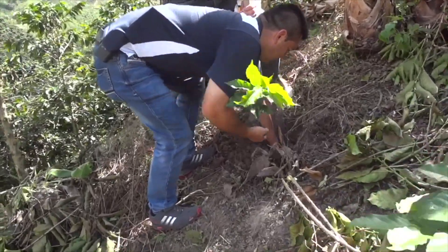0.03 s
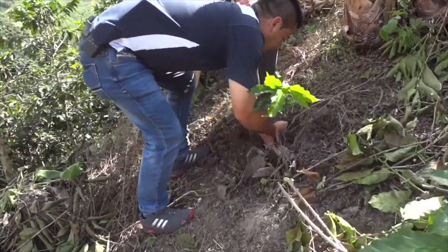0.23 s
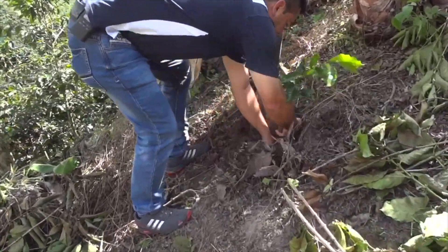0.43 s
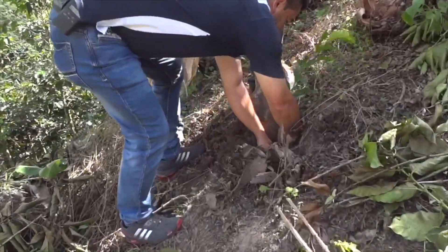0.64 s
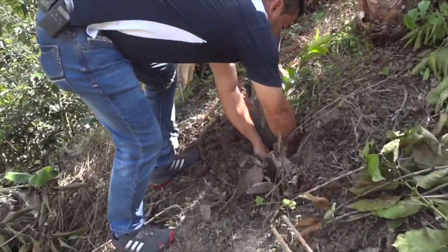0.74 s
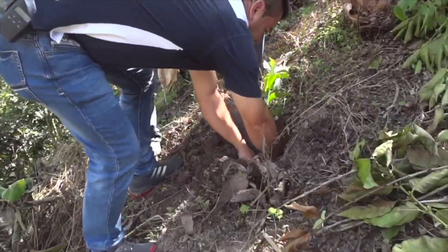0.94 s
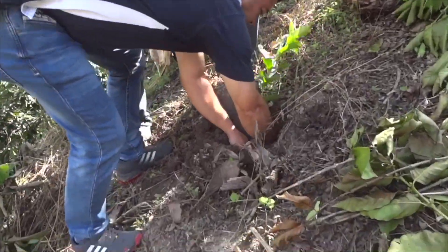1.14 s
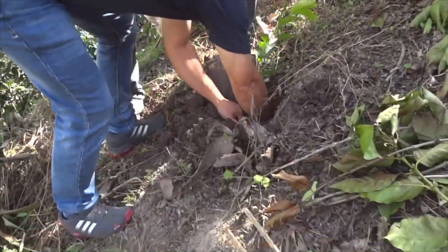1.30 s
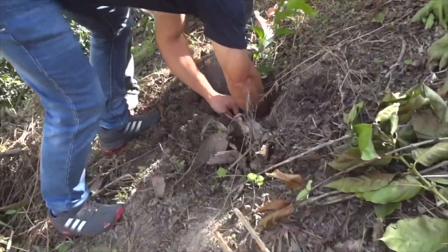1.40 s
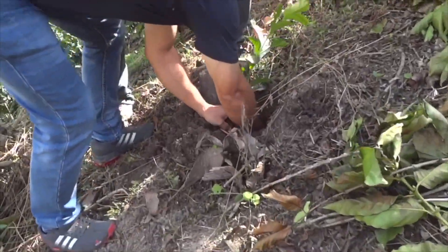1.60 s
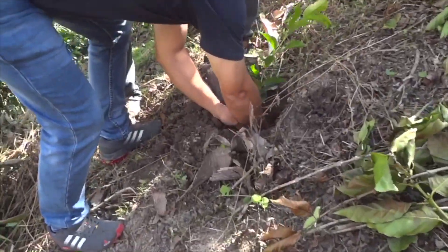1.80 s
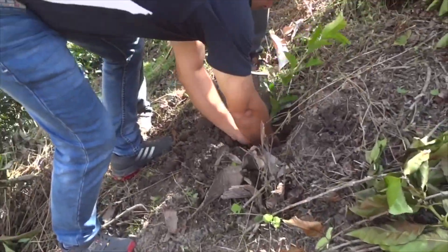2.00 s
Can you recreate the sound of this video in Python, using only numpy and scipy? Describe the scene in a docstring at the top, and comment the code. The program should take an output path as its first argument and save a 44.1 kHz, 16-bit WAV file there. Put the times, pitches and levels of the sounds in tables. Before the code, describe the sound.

Close, dry stereo sound on an open hillside: soil grinding and leaves crunching under hands, busiest at first with sharp stalk cracks, then sparser, ending in a short cluster of dull thumps, over constant faint hiss.

```python
"""An open hillside: hands push loose soil and dry leaves round a seedling, over a steady hiss.
Soil and leaves are clumped clicks ringing many small fragments; scrapes are resonant noise swells.
Stalks and twigs snap one by one, each a crack with splinters through a short resonance.
Soft low bumps and one short stick ring are damped sines with rough bodies; the bumps bunch into
a short, louder rumble near the end, where filtered noise swells beneath them."""
import sys
import numpy as np
from scipy import signal
from scipy.fft import rfft, irfft
from scipy.io import wavfile

SR = 44100
rng = np.random.default_rng(int(sys.argv[2]) if len(sys.argv) > 2 else 0)


def put_to_file(sound):
    """Save the sound as 16-bit audio at rate SR, in the file named by the first command-line argument."""
    columns = np.atleast_2d(sound).T  # one column per channel
    safe = np.clip(columns, -1, 1)
    whole_steps = np.round(safe * 32767)
    wavfile.write(sys.argv[1], SR, whole_steps.astype(np.int16))


N = 90449
T = np.arange(N) / SR
HZ = np.fft.rfftfreq(N, 1 / SR)


def amp(db):
    """Decibels to gain."""
    return 10 ** (np.asarray(db) / 20)


def unit(x):
    """Scales to an rms of one."""
    return x / np.sqrt(np.mean(x ** 2) + 1e-20)


def across(points):
    """Reads a table along log frequency."""
    hz, value = np.transpose(points)
    return np.interp(np.log(HZ + 1), np.log(hz), value)


def level(table, axis=1):
    """Turns one dB column of a table into a gain over time."""
    rows = np.array(table)
    return amp(np.interp(T, rows[:, 0], rows[:, axis]))


def colour(x, points):
    """Filters a sound by a gain table, then sets its rms to one."""
    return unit(irfft(rfft(x) * amp(across(points)), N))


def drift(rate_hz):
    """Smooth random wander with an rms of one."""
    smooth = np.exp(-(HZ / rate_hz) ** 2) * (HZ > 0)
    return unit(irfft(rfft(rng.standard_normal(N)) * smooth, N))


def ring(x, hz, q):
    """A damped resonance; a higher q rings longer."""
    return signal.lfilter(*signal.iirpeak(min(hz, SR * .45), max(q, 1), SR), x)


def pan(pan_db):
    """Left and right gains that differ by pan_db; positive leans left."""
    return amp([[pan_db / 2], [-pan_db / 2]])


def add(mix, s, sound):
    """Lays a stereo sound into the mix at s seconds."""
    part = mix[:, max(round(s * SR), 0):][:, :sound.shape[1]]
    part += sound[:, :part.shape[1]]


def grains(per_s, spread_db, clump_db, clump_hz, q, count=24):
    """Tiny fractures come in clumps; each rings one of many fragments for a few cycles."""
    out = np.zeros(N)
    for hz in np.geomspace(700, 11000, count):
        chance = rng.random(N)
        size = np.minimum(rng.exponential(1, N), np.pi)
        sign = rng.choice([-1, 1], N)
        clicks = (chance < per_s / count / SR) * amp(spread_db * size) * sign
        out += unit(ring(clicks, hz, q)) * np.sqrt(hz)  # wider bands carry more power
    return out * amp(clump_db * drift(clump_hz))


# how hard each material is worked: start_s [s], soil_level_db [dB], leaf_level_db [dB]
WORK_LEVELS = [(0, -39.5, -40.5), (.03, -40.5, -40), (.055, -34, -35.5), (.1, -33.5, -34),
               (.135, -30, -35.5), (.175, -35, -36.5), (.252, -33.5, -35), (.277, -28.5, -32),
               (.3, -35.5, -30.5), (.325, -34.5, -31), (.35, -39.5, -39), (.39, -42, -39.5),
               (.47, -42.5, -36), (.5, -45, -36), (.535, -51, -36), (.565, -33, -36.5), (.61, -44.5, -34),
               (.655, -39, -32.5), (.7, -40.5, -38.5), (.75, -44.5, -39), (.772, -38, -35.5),
               (.815, -39, -33.5), (.85, -33.5, -38), (.91, -41.5, -39.5), (.95, -37.5, -40.5),
               (1., -59, -42.5), (1.025, -37, -42), (1.06, -43.5, -40), (1.12, -36, -47), (1.155, -43, -48),
               (1.2, -41.5, -43), (1.275, -37.5, -45), (1.31, -40.5, -50), (1.42, -43, -42.5),
               (1.52, -40.5, -44.5), (1.58, -34.5, -45.5), (1.62, -40, -40), (1.655, -35.5, -40),
               (1.71, -39, -42.5), (1.74, -35, -49), (1.77, -47.5, -42), (1.835, -35.5, -46),
               (1.885, -39.5, -64), (1.93, -34.5, -41.5), (1.99, -37.5, -36), (2.05, -34, -40.5)]
# tone of the grinding crumbs: frequency_hz [Hz], relative_gain_db [dB]
SOIL_COLOUR = [(60, -40), (180, -12), (300, -3), (500, -8.5), (1000, -3), (1600, -2), (2200, -3.5),
               (3100, -0.5), (4500, -4.5), (7000, -8.5), (11000, -17.5)]


def soil():
    """Crumbs grind against each other under the palms, each fracture ringing a fragment."""
    crumbs = grains(per_s=7000, spread_db=0.0, clump_db=2.5, clump_hz=110, q=4.8)
    return level(WORK_LEVELS, axis=1) * colour(crumbs, SOIL_COLOUR)


# tone of the crackling leaves: frequency_hz [Hz], relative_gain_db [dB]
LEAF_COLOUR = [(100, -27), (500, -17), (1000, -23.5), (2000, -8.5), (3800, 3), (5500, -2), (7800, 1.5),
               (9500, -0.5), (11000, -5.5)]


def leaves():
    """Dry leaves crackle as they are pushed into the hole, in shorter rings than the soil."""
    crackle = grains(per_s=5000, spread_db=0.5, clump_db=0.5, clump_hz=228, q=2.4)
    return level(WORK_LEVELS, axis=2) * colour(crackle, LEAF_COLOUR)


# snapping stalks and twigs: start_s [s], level_db [dB], ring_hz [Hz],
# crack_db [dB, sharp crack against the ring], length_s [s], pan_db [dB, left over right]
STALK_SNAPS = [(0.0533, -30, 4640, -14, 0.0045, 2), (0.1195, -21.5, 2430, -11, 0.0022, -3),
               (0.237, -37, 2900, -2, 0.0013, 5), (.2682, -14.5, 2700, 8, 0.00066, 1),
               (0.2734, -29.5, 7300, -15, .006, -3), (0.295, -32, 4300, 5, 0.0009, 1),
               (0.307, -33, 7460, 3, .0012, -2), (0.32, -23, 7000, -5, 0.001, 1),
               (0.324, -31, 3350, -13, 0.0042, 1), (0.333, -28, 8460, 4, 0.00091, -1),
               (.3388, -24.5, 4000, 22, 0.00091, 0), (0.4895, -25.5, 6000, 17, 0.0015, 1),
               (0.5127, -24, 3320, -2, .0012, 2), (.5542, -28.5, 8200, 0, 0.0012, 1),
               (0.6445, -24.5, 5450, -4, 0.00074, 4), (0.6586, -20.5, 2400, -2, 0.0011, 1),
               (0.723, -29, 3500, -20, 0.0018, 0), (0.7671, -24.5, 3500, 21, .0012, -1),
               (0.7706, -24, 3600, 12, 0.0032, 0), (0.7845, -20.5, 4370, 0, 0.00069, 1),
               (.7925, -26, 7300, 4, 0.0013, -6), (.7962, -22.5, 10300, 0, .0012, 1),
               (.8135, -32, 10300, 1, 0.0054, 0), (0.8436, -23, 4180, 10, 0.0029, 0.5),
               (0.891, -26, 4300, -20, 0.00093, 0), (.9401, -27.5, 3900, -5, .001, -4),
               (0.948, -26, 3600, 3, 0.0016, 5.5), (0.975, -26, 4460, -19, 0.0021, 0),
               (0.9843, -28, 7600, 10, 0.0013, -12), (1.0341, -18.5, 2800, 8.5, 0.00057, -6),
               (1.038, -29, 4340, -19, 0.00074, -15), (1.1184, -31, 2250, -7, 0.0022, -9),
               (1.1657, -22.5, 4500, -2, 0.00072, 2.5), (1.241, -30, 2250, -1, 0.0012, -7),
               (1.25, -30.5, 8100, -5, .001, -1), (1.2718, -29, 2440, -6, 0.002, -5),
               (1.483, -26, 3630, -9, 0.00058, 0), (1.5437, -27.5, 3200, -7, .0028, 0),
               (1.666, -37, 3030, 11, 0.00085, -2), (1.743, -31, 3530, -1, .001, 0),
               (1.7886, -31, 3860, -21, 0.0016, 3), (1.835, -32.5, 2260, -14, 0.0015, 1)]
SNAP_RISE_S, SNAP_Q, SPLINTERS_PER_S = 0.00017, 1.9, 9000
CLEAN_BREAK_S = 0.0003  # a break this long has as much energy in its splinters as in its first crack


def snaps():
    """A stalk breaks with one crack and rings briefly; longer breaks put more energy into splinters."""
    out = np.zeros((2, N))
    t = T[:2048] - T[128]  # the first crack falls at zero
    for s, db, hz, crack_db, length, pan_db in STALK_SNAPS:
        run = np.exp(-np.maximum(t, 0) / length + np.minimum(t, 0) / SNAP_RISE_S)
        hits = rng.random(len(t)) < SPLINTERS_PER_S / SR
        splinters = unit(hits * rng.choice([-1, 1], len(t)) * run)
        splinters = splinters * np.sqrt(length / CLEAN_BREAK_S / len(t))
        force = np.where(t == 0, 1, splinters)
        crack = signal.lfilter(*signal.butter(2, [1300, 12000], "band", fs=SR), force)
        stalk = ring(ring(crack, hz, SNAP_Q), hz, SNAP_Q)
        sound = unit(stalk) + amp(crack_db) * unit(crack)
        sound = amp(db) * unit(sound) * np.sqrt(length / t[-1])  # level_db is spread over length_s
        add(out, s + t[0], sound * pan(pan_db))
    return out


# hands and sleeves rubbing along the ground and the wall of the hole:
# start_s [s], length_s [s], level_db [dB], resonance_hz [Hz], pan_db [dB, left over right]
RUBS = [(0.017, 0.12, -57, 332, 0), (0.106, 0.052, -36.5, 2650, -3), (0.243, 0.052, -40, 1290, 5),
        (0.651, 0.012, -32.5, 2020, -4), (1.007, 0.044, -37.5, 2140, -3), (1.088, 0.057, -43, 2270, -1),
        (1.147, 0.071, -38, 2310, -4), (1.228, 0.064, -39.5, 2500, -1), (1.32, 0.056, -48, 2500, -10),
        (1.642, .03, -37.5, 2460, -1)]
SCRAPE_Q = 3.7


def scrapes():
    """An uneven rub swells and fades through one broad resonance."""
    out = np.zeros((2, N))
    for s, length, db, hz, pan_db in RUBS:
        rub = rng.standard_normal(N) * amp(1.8 * drift(rate_hz=100))
        rub = unit(ring(ring(rub, hz, SCRAPE_Q), hz, SCRAPE_Q))
        arch = np.sin(np.pi * np.clip((T - s) / length, 0, 1)).clip(0) ** 0.44
        out += amp(db) * arch * rub * pan(pan_db)
    return out


# dull low bumps, and at 1.546 s the short ring of a stick: start_s [s],
# tone_peak_db [dB, before the low cut], pitch_hz [Hz], decay_s [s],
# left_lead_rad [radians by which the left side leads]
BUMPS_AND_STICK = [(0.2894, -38.5, 124, 0.014, 1.4), (0.4497, -29.5, 250, 0.0022, -1.8),
                   (.459, -37, 110, 0.0032, .2), (1.02, -30, 253, 0.0029, 1.95),
                   (1.028, -39, 110, 0.0041, .8), (1.073, -40.5, 180, .005, 1.7),
                   (1.195, -30, 232, 0.0011, -2.6), (1.245, -39.5, 149, 0.0028, 1),
                   (1.322, -41, 130, .005, 1.6), (1.34, -35, 170, 0.003, 1.6),
                   (1.352, -39, 130, 0.0077, 0.85), (1.396, -39.5, 180, .003, 1.3),
                   (1.45, -39.5, 128, 0.0049, 1.3), (1.546, -38, 675, 0.009, 0.9),
                   (1.5642, -35, 169, 0.0064, 1.5), (1.761, -33, 150, 0.0062, 1.4),
                   (1.773, -29, 167, 0.025, 1.3), (1.796, -27, 248, 0.015, 2),
                   (1.8205, -25, 190, 0.0099, 1.2), (1.831, -17, 347, 0.002, 2.2),
                   (1.837, -22, 181, 0.013, 2), (1.854, -19, 184, 0.011, 0.49),
                   (1.8622, -21.5, 312, 0.011, 2.33), (1.8841, -20, 440, 0.0042, 1.93),
                   (1.889, -22.5, 246, 0.0032, 1.4), (1.907, -37, 152, 0.0051, 0.82),
                   (1.927, -32, 170, .005, 2.4), (1.939, -38, 131, .005, 1.4),
                   (1.961, -25.5, 192, 0.003, 2.1), (2.028, -32, 205, 0.0092, 3.7),
                   (2.036, -47, 234, 0.0041, 1.5)]
BUMP_RISE_S, BUMP_DIRT_DB = 0.00085, -12.5  # onset; rough body against the tone


def bumps_and_stick():
    """Low bumps and one stick ring, each a quickly decaying sine with a little rough body."""
    out = np.zeros((2, N))
    t = T[:4096]
    for s, db, hz, decay, lead in BUMPS_AND_STICK:
        shape = (1 - np.exp(-(t / BUMP_RISE_S) ** 2)) * np.exp(-t / decay)
        phase = 2 * np.pi * hz * t + np.array([[lead / 2], [-lead / 2]])
        dull = signal.butter(4, 1.79 * hz, fs=SR, output="sos")
        body = unit(signal.sosfilt(dull, rng.standard_normal(len(t))))
        knock = np.sin(phase) + amp(BUMP_DIRT_DB) * body
        add(out, s, amp(db) * shape / shape.max() * knock)
    low_cut = signal.butter(3, 70, "high", fs=SR, output="sos")
    return signal.sosfilt(low_cut, out)


# swell of the rumble under the bumps, before its lumps: start_s [s], level_db [dB]
RUMBLE_LEVELS = [(0, -72), (.17, -75), (.225, -60), (.25, -63), (.3, -52), (.34, -67), (.43, -63),
                 (.465, -49), (.52, -61.5), (.65, -67.5), (.74, -65), (.785, -52.5), (.85, -65.5),
                 (.98, -66.5), (1.03, -55), (1.1, -61), (1.35, -52.5), (1.51, -59), (1.57, -48.5),
                 (1.62, -62), (1.72, -62), (1.79, -40), (1.86, -35), (1.91, -38), (2., -46.5), (2.05, -34)]
# tone of the rumble: frequency_hz [Hz], relative_gain_db [dB]
RUMBLE_TONE = [(20, -46), (50, -17), (85, -5.5), (170, -2.5), (300, -8.5), (480, -11.5), (800, -22),
               (2000, -42)]
RUMBLE_LEAD_S, RUMBLE_SPREAD_DB = 0.00067, -3  # left lead; separate noise against the shared noise


def rumble():
    """Low noise swells in uneven lumps; its shared part reaches the left side first."""
    noise = rng.standard_normal((3, N))
    lead = np.exp(1j * np.pi * HZ * RUMBLE_LEAD_S * np.array([[1], [-1]]))
    shared = irfft(rfft(noise[2]) * lead, N)
    pair = shared + amp(RUMBLE_SPREAD_DB) * noise[:2]
    lumps = amp(2.1 * drift(rate_hz=66))
    return level(RUMBLE_LEVELS) * colour(pair, RUMBLE_TONE) * lumps


# likeness of diffuse sound at the two microphones:
# frequency_hz [Hz], correlation [no unit, clipped to -1..1 in use]
DIFFUSE_LIKENESS = [(60, -0.47), (270, -0.04), (570, 2.54), (1200, 0.85), (2600, 2.8), (5500, 3.4),
                    (11000, 3.44)]


def diffuse(pair):
    """Two unrelated signals become sound that reaches both microphones from all round."""
    a, b = rfft(pair, N)
    likeness = np.clip(across(DIFFUSE_LIKENESS), -1, 1)
    mid = a * np.sqrt((1 + likeness) / 2)
    side = b * np.sqrt((1 - likeness) / 2)
    return irfft(np.array([mid + side, mid - side]), N)


SCATTER_DB, SCATTER_S = -12.5, 0.0046  # scatter level and decay


def ground(x):
    """The rough slope scatters each sound back within a few hundredths of a second."""
    taps = rng.standard_normal((2, N)) * np.exp(-T / SCATTER_S) * (T > .0015)
    tail = unit(diffuse(taps))[:, :4096] / np.sqrt(N)
    scattered = signal.fftconvolve(x.mean(0)[None], tail, axes=1)[:, :N]
    return x + amp(SCATTER_DB) * scattered


# tone of the hillside hiss: frequency_hz [Hz], relative_gain_db [dB]
HISS_COLOUR = [(20, -29), (45, -9), (90, -22), (160, -28), (320, -12.5), (600, -4.5), (1100, -6),
               (2000, 2.5), (3400, -2.5), (5200, -5.5), (8000, -12), (11000, -10)]
HISS_DB = -40  # before the stereo balance


def hiss():
    """The steady, faintly wavering hiss of the hillside, as diffuse coloured noise."""
    air = diffuse(rng.standard_normal((2, N)))
    return amp(HISS_DB + 0.2 * drift(rate_hz=33)) * colour(air, HISS_COLOUR)


# phase lead of the left microphone: frequency_hz [Hz], left_lead_rad [radians]
LEFT_LEAD = [(60, 0.41), (400, 1), (1000, 0.99), (2000, 0.69), (3200, 0.33), (6000, 0), (11000, -0.5)]
# level balance of the microphones: frequency_hz [Hz], pan_db [dB, left over right]
LEFT_BALANCE = [(200, -.4), (1100, -1.1), (2000, 1.1), (3500, 1.46), (6500, 0.65), (11000, -0.0011)]


def scene():
    """Handwork and hiss share a stereo lean that varies with pitch; bumps, stick and rumble join them."""
    air = ground(soil() + leaves() + scrapes() + snaps()) + hiss()
    left = amp(across(LEFT_BALANCE) / 2) * np.exp(.5j * across(LEFT_LEAD))
    placed = irfft(rfft(air) * np.array([left, 1 / left]), N)
    return placed + bumps_and_stick() + rumble()


EDGE_HZ = 11130


def record(dry):
    """The recorder's band limit: a steep low-pass."""
    low_pass = signal.firwin(601, EDGE_HZ, window=("kaiser", 8), fs=SR)
    return signal.oaconvolve(dry, low_pass[None], "same")


dry = scene()
out = record(dry)
put_to_file(out)
```